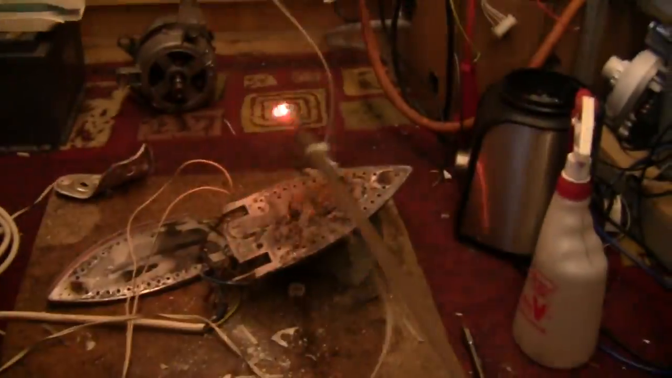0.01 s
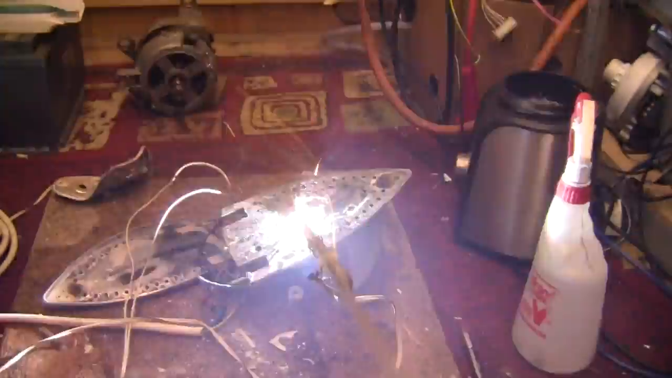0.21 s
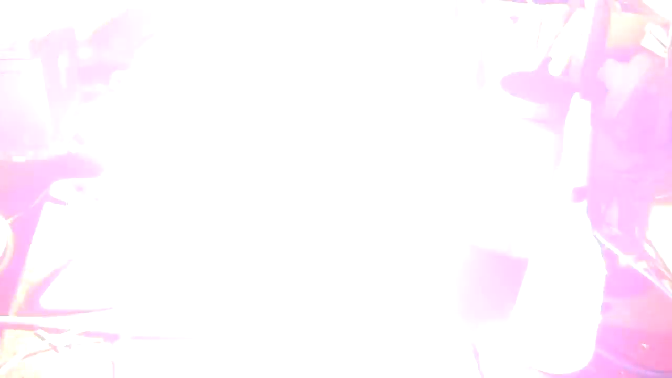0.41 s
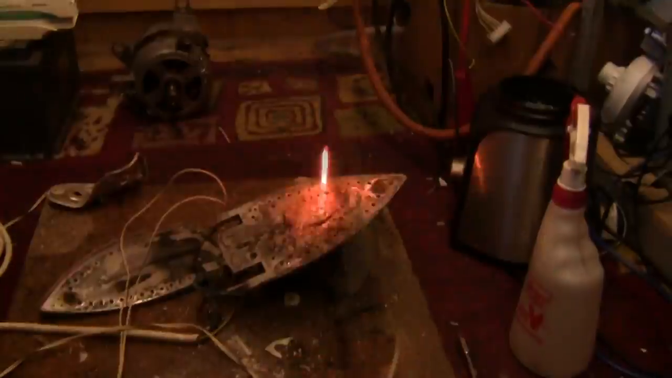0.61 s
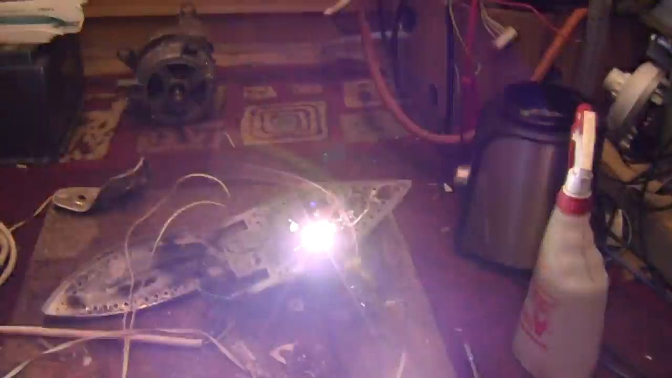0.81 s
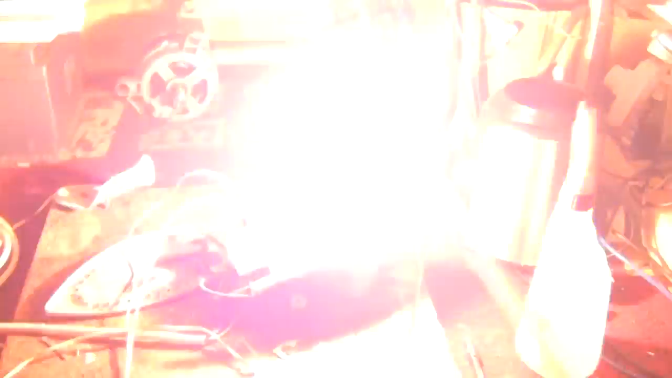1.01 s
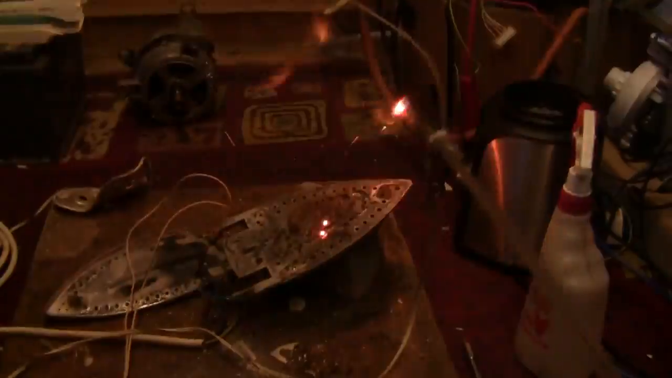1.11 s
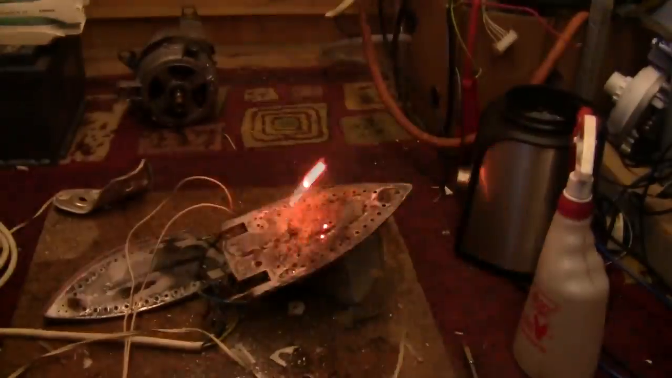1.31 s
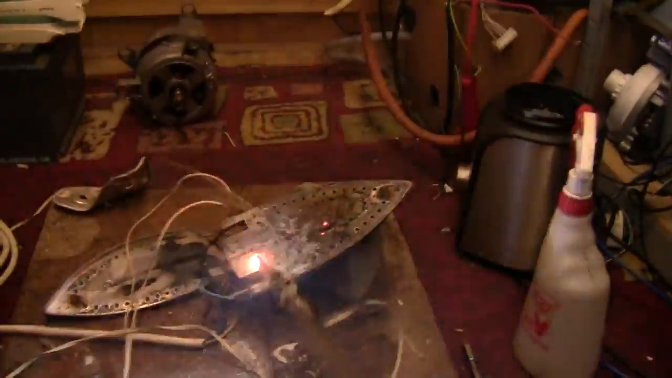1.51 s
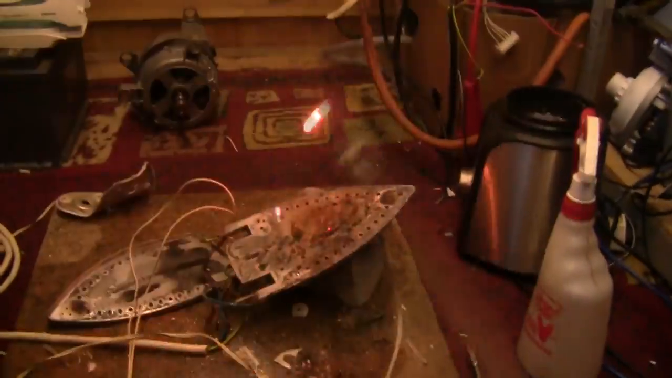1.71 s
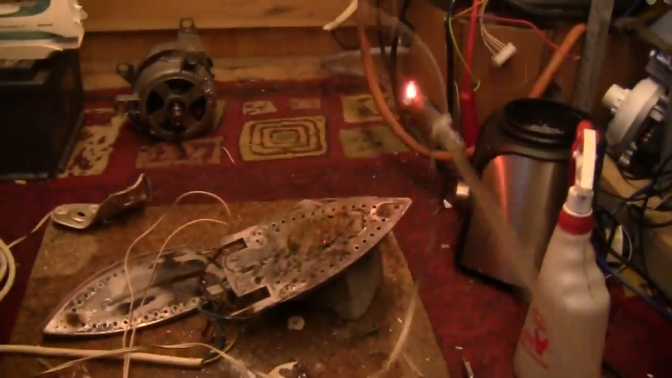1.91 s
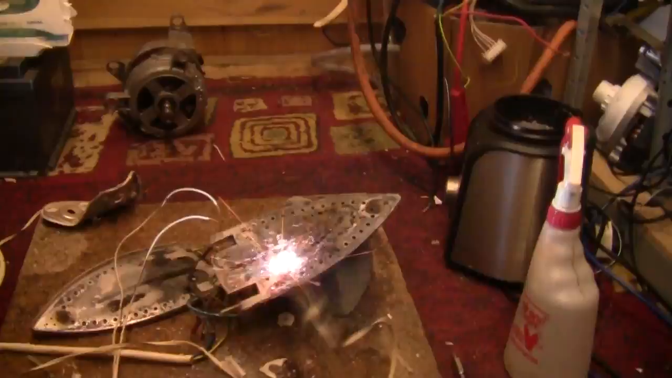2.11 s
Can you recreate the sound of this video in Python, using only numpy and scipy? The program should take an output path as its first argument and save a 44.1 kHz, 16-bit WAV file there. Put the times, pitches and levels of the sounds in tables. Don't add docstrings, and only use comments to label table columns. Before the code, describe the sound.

Harsh mains-pitched arc buzz swells and dies after metallic clanks, with sharp snaps and spitting sparks

```python
import sys
import numpy as np
from scipy import signal
from scipy.fft import rfft, irfft
from scipy.io import wavfile
from scipy.ndimage import uniform_filter1d

SR = 44100
rng = np.random.default_rng(int(sys.argv[2]) if len(sys.argv) > 2 else 0)


def master_out(mix):
    frames = np.transpose(np.atleast_2d(mix))
    ceiling = np.clip(frames, -1, 1)
    pcm = np.round(ceiling * 32767).astype(np.int16)
    wavfile.write(sys.argv[1], SR, pcm)


def to_linear_factor(level_db):
    exponent = np.asarray(level_db, float) / 20
    return 10 ** exponent


N = 97020
t = np.arange(N) / SR
PUFF_HZ = 99.84


def unit(x):
    return x / np.sqrt(np.mean(x ** 2))


def colour(x, table, share=1):
    hz = np.arange(x.shape[-1] // 2 + 1) * SR / x.shape[-1] + 1
    points_hz, points_db = np.array(table, float).T
    gain_db = np.interp(np.log(hz), np.log(points_hz + 1), points_db)
    return irfft(rfft(x) * to_linear_factor(share * gain_db), x.shape[-1])


def cut_low(x, order, hz):
    return signal.sosfilt(signal.butter(order, hz, "high", fs=SR, output="sos"), x)


def walk(rate_hz):
    hold = int(SR / rate_hz)
    steps = np.repeat(rng.standard_normal(N // hold + 1), hold)
    return unit(uniform_filter1d(steps, hold)[:N])


def grit(size, db):
    grain = np.minimum(rng.exponential(size=size), 5)
    return rng.standard_normal(size) * to_linear_factor(db * grain)


def add(out, at, x):
    i = int(at * SR)
    out[i:i + len(x)] += x[:N - i]


FLUTTER_DB, FLUTTER_S = 2.2, .005


def ring(modes, u, most_s):
    hz, gain_db, t60 = np.array(modes).T[:, :, None]
    flutter = unit(uniform_filter1d(rng.standard_normal((len(hz), len(u))), int(FLUTTER_S * SR)))
    level_db = gain_db + FLUTTER_DB * flutter - 60 * u / np.minimum(t60, most_s)
    phase = rng.standard_normal((len(hz), 1))
    return (to_linear_factor(level_db) * np.sin(2 * np.pi * hz * u + phase)).sum(axis=0)


PUFF_AT_S, SKEW_RAD = .4888, .6
WOBBLE_DB, FOURTH_DB, THIRD_UNDER_DB = .25, -5.5, 11
EDGE_DB_OCT, EDGE_SCATTER_DB = -8.5, 3.2
ROAR_DB, ROAR_HZ = -1.5, 362
# t/s, hum level/dB, dullness [dB per overtone], restrike edge level/dB
ARC_COURSES = [
    [(.27, -38, -22, -53.5), (.358, -31.5, -2.5, -34.5), (.426, -20.5, -5.5, -39), (.47, -16.5, -5, -38.5),
     (.542, -13.5, -11.5, -38.5), (.598, -13.5, -18, -32.5), (.625, -25, -34, -47.5), (.67, -34, -17, -54),
     (.74, -41, -8, -49.5)],
    [(.8, -38, -10, -44), (.92, -46, -4.5, -42), (.984, -25.5, -0.5, -34), (1.046, -16.5, -9.5, -41),
     (1.096, -14, -13, -34.5), (1.146, -15.5, -20, -36), (1.202, -33.5, -26, -59), (1.28, -41, -32, -67),
     (1.38, -48.5, -19, -61)],
    [(1.51, -55, -16, -45), (1.55, -45.5, -12, -46), (1.61, -34, -10, -44), (1.64, -43, -8, -45.5),
     (1.662, -37, 1.5, -28.5), (1.682, -27, 0.5, -33), (1.702, -32.5, -8, -36.5), (1.732, -43, -4, -51.5),
     (1.83, -42, -14, -59)],
    [(-.02, -38, -14, -62), (.025, -43, -16, -60), (.05, -46, -21, -67), (.11, -57, -20, -62.5),
     (.175, -39.5, -12, -63), (.215, -46, -11, -55.5), (.25, -47, -12, -59)],
]
ARC_LEADS = [0.000083, 0.000112, 0.00086, 0.0001]


def arc():
    out = np.zeros(N)
    turns = PUFF_HZ * (t - PUFF_AT_S)
    roar_band = signal.butter(1, [ROAR_HZ / 2, 2 * ROAR_HZ], "band", fs=SR, output="sos")
    roar = unit(signal.sosfilt(roar_band, grit(N, 5.2)))
    roar = roar * to_linear_factor(ROAR_DB) * (1 + .5 * np.sin(2 * np.pi * turns))
    for course, early_s in zip(ARC_COURSES, ARC_LEADS):
        s, *levels = np.array(course).T
        levels[1] = np.minimum(levels[1], 3)
        hum, dull, edge = (uniform_filter1d(np.interp(t, s, c), size=900) for c in levels)
        fade = np.clip(np.minimum(t - s[0], s[-1] - t) / 0.011, 0, 1)
        out += fade * to_linear_factor(edge) * roar
        for k in range(1, 14):
            body_db = hum + dull * (k - 1) + FOURTH_DB * (k == 4) + WOBBLE_DB * walk(25)
            body = to_linear_factor(body_db) * (k < 5)
            top = np.minimum(edge, hum - THIRD_UNDER_DB) if k == 3 else edge
            thin_db = top - 2.5 + EDGE_DB_OCT * np.log2(k / 4) + EDGE_SCATTER_DB * walk(24.39)
            thin = to_linear_factor(thin_db) * (k > 2)
            smear = rng.standard_normal() * np.clip((k - 4) / 2, 0, 2)
            phase = 2 * np.pi * k * (turns + PUFF_HZ * early_s) + SKEW_RAD + smear
            out += fade * np.hypot(body, thin) * np.sqrt(2) * np.sin(phase)
    return out


RING_MAX_S, PUSH_S = 0.46, .0003
CRACK_S, RATTLE_S, RATTLE_DB = 0.0038, 0.014, -7
# t/s, peak level/dB, ring share level/dB, struck spot [index], bench level/dB
BLOWS_ON_PLATE = [
    (0.2400, -3.5, 5.5, 0, -12.5),
    (0.2526, -12.5, -2, 1, -12),
    (0.7473, -13, 9, 1, -15.5),
    (0.7543, -22, -0.5, 3.5, -9),
    (0.8631, -15.5, -0.5, 4, -20.5),
    (1.4964, -15.5, 6, 2, -25),
    (1.5038, -20.5, 7.5, 3, -23),
    (1.512, -8, 0, 3, -19),
]
# f/Hz, level/dB, t60 [s]
PLATE_MODES = [
    [(502.5, -15, 0.22), (578, -13.5, 0.079), (887, -22, 0.15), (1890, -5.5, 0.17), (2337, -4.5, 0.1),
     (2543, -1, 0.19), (2640, -1, 0.052), (3025, -8.5, 0.092), (3160, -5.5, 0.19), (3220, -2.5, 0.16),
     (3440, -6.5, 0.16), (4120, -8.5, 0.09), (4460, -6.5, 0.074), (6220, -18, 0.18)],
    [(527.7, 0, 0.19), (587, 1.5, 0.096), (877, -3, 0.17), (1296, -6, 0.4), (1627, 1.5, 0.12),
     (1772, 5, 0.098), (1895, 5, 0.21), (2298, 5, 0.08), (2532, 3.5, 0.17), (3060, -21, 0.15),
     (2050, -3.5, .04), (2540, -4, .04), (3950, -21, 0.072), (4700, -29, 0.19)],
    [(703, -8, 0.046), (1095, 4.5, 0.027), (1310, -3, 0.033), (1650, 1.5, 0.03), (2600, -2.5, 0.06)],
    [(508, -9.5, 0.23), (610, -0.5, 0.039), (740, -16, .1), (1323, -6.5, 0.11), (1810, -10, 0.11),
     (2370, -7, .045), (2800, -13, 0.035), (3260, -5.5, 0.078), (3472, -16, 0.16), (3770, 5, 0.068),
     (3970, 4, 0.11), (4550, -6.5, 0.13), (4800, -16, .07), (5870, -21, .07)],
    [(1330, -7, 0.22), (1884, -3, .12), (2220, -2, 0.06), (2520, 1, 0.066), (3040, -9, 0.25),
     (4500, -7, 0.067)],
]
# f/Hz, level/dB, t60 [s]
BENCH_MODES = [(103.4, -23.5, 0.78), (182.6, -7, 0.11), (242, -18, 0.15), (329, -20, 0.082)]
# f/Hz, level/dB
CRACK_COLOUR = [(150, -10), (600, -3), (1200, -14), (2600, -2.5), (5300, -19.5), (9000, -8.5),
                (12000, -24.5), (16000, -38)]


def plate():
    clank, boom, u = np.zeros(N), np.zeros(N), t[:SR // 2]
    for at, db, ring_db, spot, bench_db in BLOWS_ON_PLATE:
        modes = ring(PLATE_MODES[round(spot)], u, RING_MAX_S)
        noise = unit(colour(grit(len(u), 3.8), CRACK_COLOUR))
        shape = np.exp(-u / CRACK_S) + to_linear_factor(RATTLE_DB) * np.exp(-u / RATTLE_S)
        add(clank, at, to_linear_factor(db) * 0.42 * noise * shape)
        push = 1 - np.exp(-u / PUSH_S)
        add(boom, at, to_linear_factor(db + ring_db) * modes / np.abs(modes).max() * push)
        add(boom, at, to_linear_factor(bench_db) * ring(BENCH_MODES, u, 1) * np.minimum(u / 0.0039, 1))
    return clank, boom


SNAP_S = .00005
# t/s, peak level/dB
DISCHARGES = [(0.2406, -9), (0.2499, 0), (.4612, -22), (.5032, -21), (0.7478, -7), (0.8633, -9),
              (0.9121, -6), (1.5042, -8), (1.5058, -2), (1.5123, -4)]


def snaps():
    out, x = np.zeros(N), t[:64] / SNAP_S - 3
    for at, db in DISCHARGES:
        add(out, at - 3 * SNAP_S, to_linear_factor(db) * (1 - x ** 2) * np.exp(-x ** 2 / 2))
    return out


SPARK_DB, SPARK_GRIT_DB, SPARK_S, SPARK_LOW_HZ = -5.5, 2.5, 0.0017, 950
# t/s, peak level/dB, tilt [dB per octave]
SPARK_BURSTS = [(0.3224, -19, 7), (0.3608, -9.5, -3), (0.403, -12, -2), (0.4412, -15.5, 0),
                (0.4606, -12.5, 1), (0.482, -13, -3), (0.5026, -9, -1), (0.5591, -22.5, 3.5),
                (0.5814, -35, -13), (0.5994, -20, -8), (0.7921, -4, -4.3), (0.9117, -2, 5),
                (0.916, -12.5, 3), (0.9527, -5.5, -4), (1.018, -9, -6.3), (1.0388, -10, -2.5),
                (1.059, -16, -0.5), (1.0785, -11, -3), (1.0969, -18, 1), (1.7733, -28, 2.5),
                (1.954, -24, -1), (1.9695, -26.5, 2), (2.107, -30, 7)]
# t/s, peak level/dB, tilt [dB per octave]
SPUTTER_BURSTS = [(1.5044, 2.5, 0.1), (1.6242, -3.5, 0.23), (1.6324, -4, 0.18), (1.6434, -3.5, 0.11),
                  (1.6525, -12, 0.091), (1.6643, -7, 0.1), (1.673, -8, 0.113), (1.6823, -7.5, 0.13)]
# f/Hz, level/dB
SPARK_COLOUR = [(180, 9), (300, 2), (1900, -1.5), (2360, -6.5), (3240, 0.5), (5430, -6.5), (7690, -1),
                (12700, -12), (16000, -31)]


def sparks():
    out, x = np.zeros(N), t[:4096] / SPARK_S
    for at, db, tilt_db in list(SPARK_BURSTS) + list(SPUTTER_BURSTS):
        tilt_db = np.clip(tilt_db, -4, 5)
        noise = colour(grit(len(x), SPARK_GRIT_DB), SPARK_COLOUR)
        noise = unit(colour(noise, [(500, -3 * tilt_db), (16000, 2 * tilt_db)]))
        add(out, at, to_linear_factor(db + SPARK_DB) * noise * x * np.exp(-x))
    return signal.lfilter(*signal.butter(1, SPARK_LOW_HZ, "high", fs=SR), out)


# t/s, peak level/dB, f/Hz, t60 [s]
BEADS = [(.9125, -30, 3590, .03), (.9525, -22.5, 3610, 0.024), (1.018, -29, 2600, .04),
         (1.079, -28.5, 5500, 0.021), (1.5052, -19.5, 6420, 0.062), (1.5052, -24, 7700, 0.033),
         (1.6261, -25, 3160, 0.029), (1.6335, -18, 3630, 0.027), (1.6326, -17.5, 7670, 0.035),
         (1.644, -21.5, 4230, 0.051), (1.643, -21.5, 3290, 0.05), (1.664, -25, 3150, 0.033),
         (1.6824, -21, 3970, 0.033)]


def pings():
    out, u = np.zeros(N), t[:4096]
    for at, db, hz, t60 in BEADS:
        add(out, at, to_linear_factor(db) * ring([(hz, 0, t60)], u, 1) * np.minimum(u / 0.0011, 1))
    return out


HISS_GRIT_DB, HISS_PULSE = 1, 0.35
# t/s, level/dB
HISS_LEVEL = [(0, -57.5), (.23, -60), (.3, -42.5), (.6, -49), (.635, -70), (.74, -61.5), (.77, -40.5),
              (.95, -41), (1.14, -51.5), (1.17, -67), (1.295, -63), (1.32, -49.5), (1.49, -49.5),
              (1.625, -46.5), (1.64, -28.5), (1.7, -37.5), (1.735, -49), (2.2, -64.5)]
# f/Hz, level/dB
HISS_TONE = [(590, -9.5), (1000, -18), (2000, -6), (3200, -11.5), (4200, -11), (5500, -14), (9490, -9),
             (13800, -30), (16000, -56)]


def hiss():
    throb = 1 + HISS_PULSE * np.cos(np.pi * PUFF_HZ * (t - .463))
    level_db = np.interp(t, *np.array(HISS_LEVEL).T) + 1.2 * walk(32)
    return to_linear_factor(level_db) * throb * unit(colour(grit(N, HISS_GRIT_DB), HISS_TONE))


SHED_DB, SHED_FADE_DB, SHED_WALK_DB = -43, -1.5, .8
# f/Hz, level/dB
SHED_COLOUR = [(20, -25), (38, -10), (58, -20), (105, -8.5), (200, -7.5), (400, -17.5), (1200, -27),
               (16000, -62)]


def shed():
    noise, out = rfft(rng.standard_normal(N)), 0
    octave = np.log2(np.arange(len(noise)) * SR / N + 1)
    for centre in np.arange(4, 15):
        band = irfft(noise * np.clip(1 - np.abs(octave - centre), 0, 1), N)
        out = out + to_linear_factor(SHED_WALK_DB * walk(10.8)) * band
    return unit(colour(out, SHED_COLOUR)) * to_linear_factor(SHED_DB + SHED_FADE_DB * t / t[-1])


ROOM_T60_S, ROOM_GAP_S, ROOM_TOP_HZ = 0.2, 0.0032, 6500


def room(near):
    u = t[:SR // 2]
    tail = rng.standard_normal((2, len(u))) * to_linear_factor(-60 * u / ROOM_T60_S) * (u > ROOM_GAP_S)
    tail = signal.lfilter(*signal.butter(1, ROOM_TOP_HZ, fs=SR), tail)
    return [signal.fftconvolve(near, h / np.sqrt(np.sum(h ** 2)))[:N] for h in tail]


SMEAR_S, SIDE_ROOM_DB = .004, -7
# f/Hz, level/dB
SOURCE_WIDTH = [(30, -40), (90, -36), (160, -26), (350, -24), (1000, -18), (5000, -13), (10000, -9),
                (12500, -4)]
# f/Hz, level/dB
RUMBLE_WIDTH = [(20, -11), (50, -14), (100, -22), (400, -16), (3000, -6), (16000, -3)]


def sides(mid, apart):
    smear = rng.standard_normal(1024) * np.exp(-t[:1024] / SMEAR_S)
    smeared = signal.fftconvolve(mid, smear / np.sqrt(np.sum(smear ** 2)))[:N]
    side = colour(smeared, SOURCE_WIDTH)
    side = side + to_linear_factor(SIDE_ROOM_DB) * colour(apart, SOURCE_WIDTH, 0.85)
    return side + colour(shed(), RUMBLE_WIDTH)


LOW_CUT_HZ, ROOM_DB = 290, -8.5


def scene():
    clank, boom = plate()
    near = cut_low(clank + snaps() + sparks() + hiss(), 2, LOW_CUT_HZ)
    wet, apart = room(near)
    mid = arc() + near + cut_low(boom, 2, 80) + pings() + to_linear_factor(ROOM_DB) * wet + shed()
    side = sides(mid, apart)
    return np.array([mid + side, mid - side])


def low_pass(x):
    return signal.sosfilt(signal.butter(12, 16520, fs=SR, output="sos"), x)


LEFT_LAG_S = .000011
# f/Hz, level/dB
PORT_DIFFERENCE = [(60, -1.65), (150, 0), (300, 2.6), (900, 1.5), (5000, -2.5), (8000, -5.5), (11000, -9.5),
                   (14000, -13.5)]
# f/Hz, level/dB
MIC_TREBLE = [(1000, 0), (13500, 0), (15000, -4), (16400, -10), (16600, -70)]


def record(dry):
    hz = np.arange(N // 2 + 1) * SR / N
    late = irfft(rfft(dry[0]) * np.exp(-2j * np.pi * hz * LEFT_LAG_S), N)
    ports = np.array([colour(late, PORT_DIFFERENCE, .5), colour(dry[1], PORT_DIFFERENCE, -.5)])
    rounded = np.tanh(0.66 * ports) / 0.74
    return low_pass(colour(rounded, MIC_TREBLE))


dry = scene()
out = record(dry)
master_out(out)
```